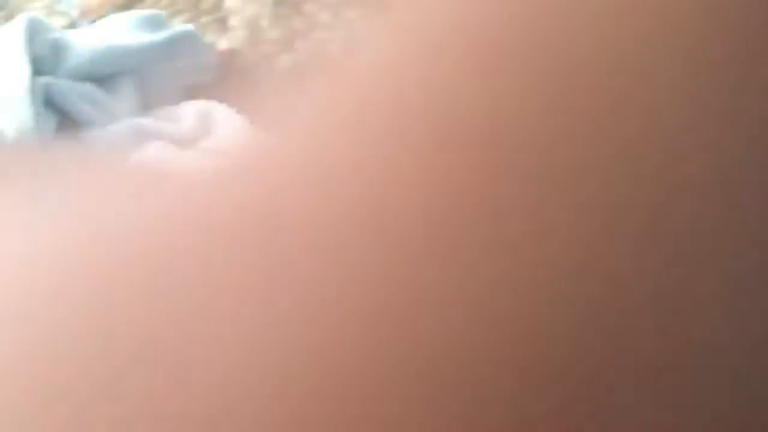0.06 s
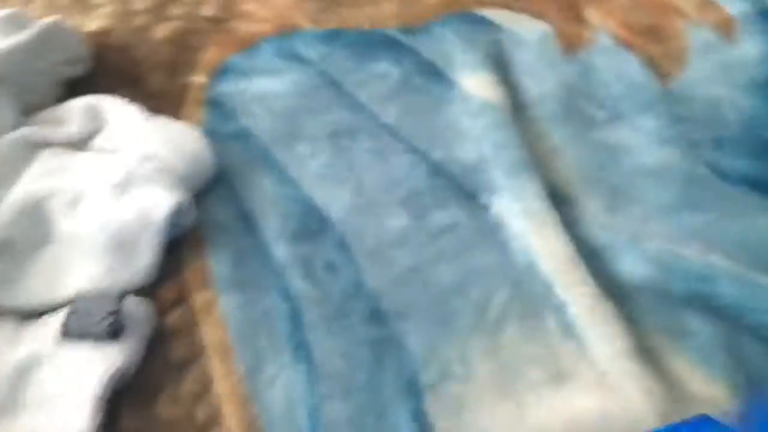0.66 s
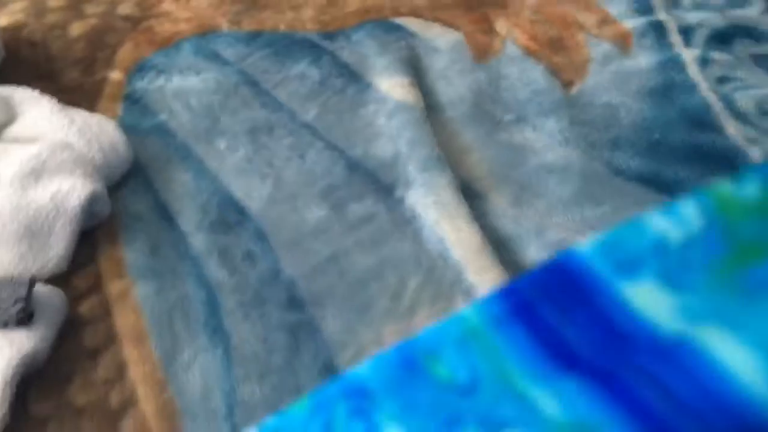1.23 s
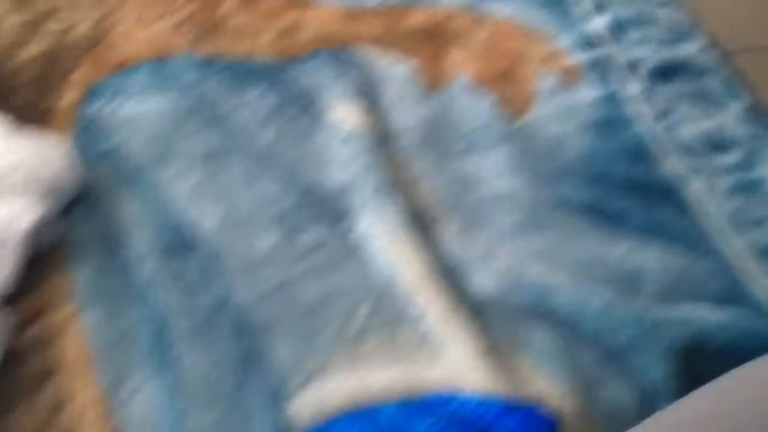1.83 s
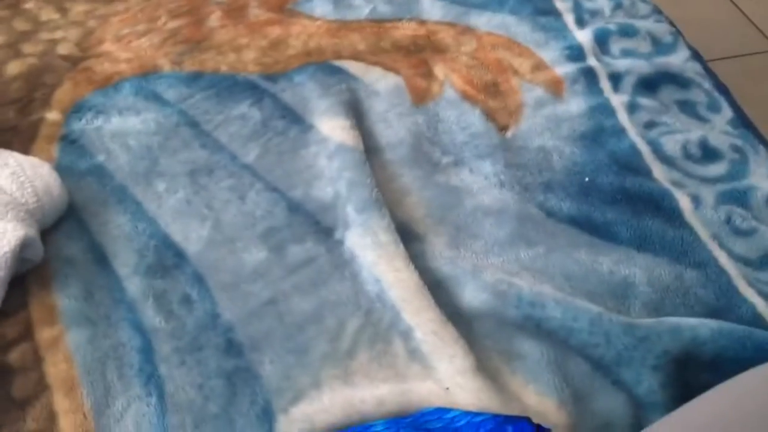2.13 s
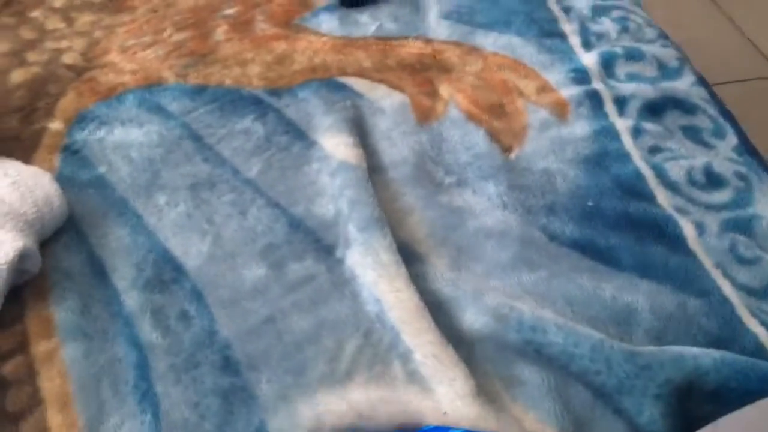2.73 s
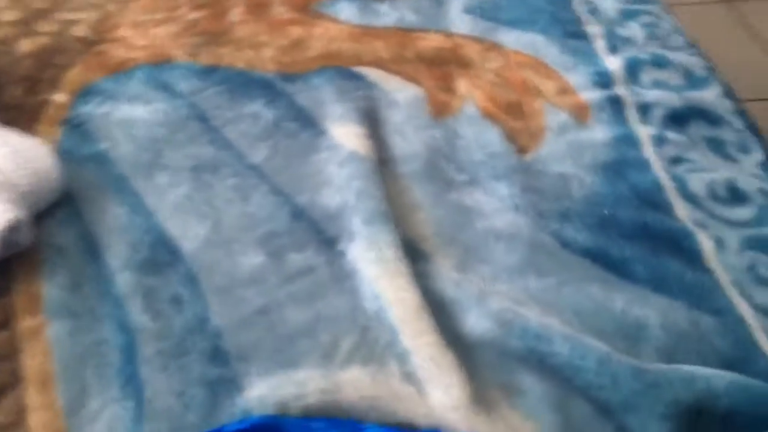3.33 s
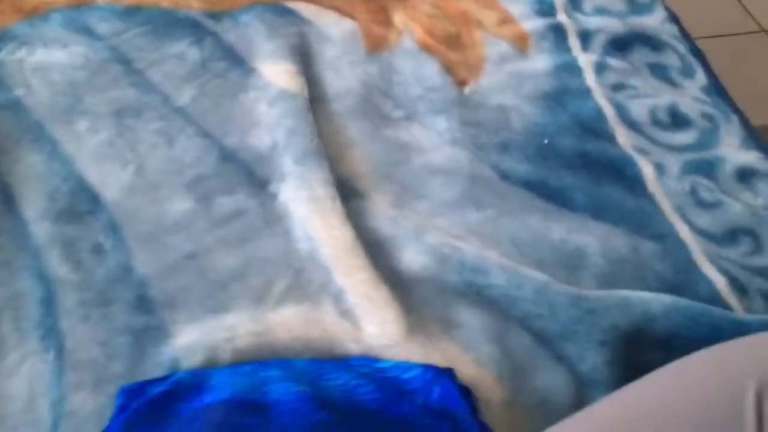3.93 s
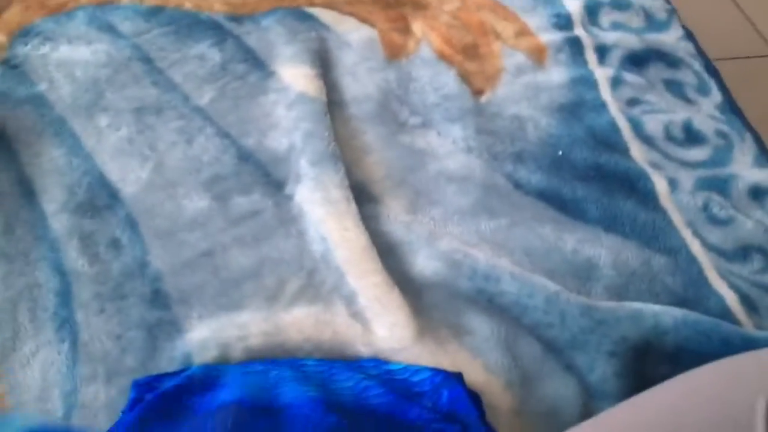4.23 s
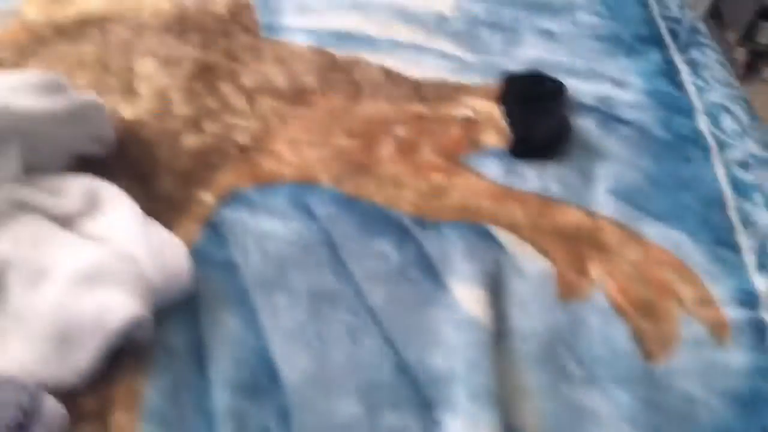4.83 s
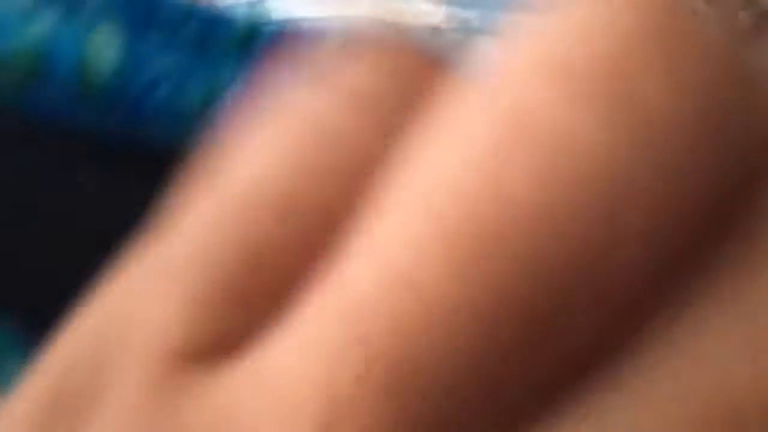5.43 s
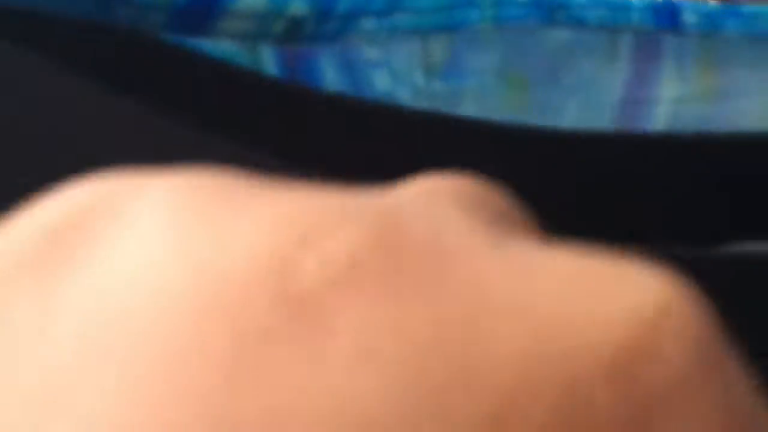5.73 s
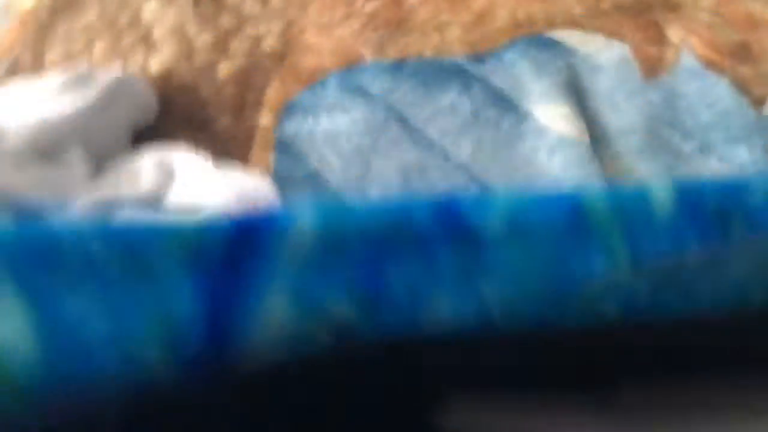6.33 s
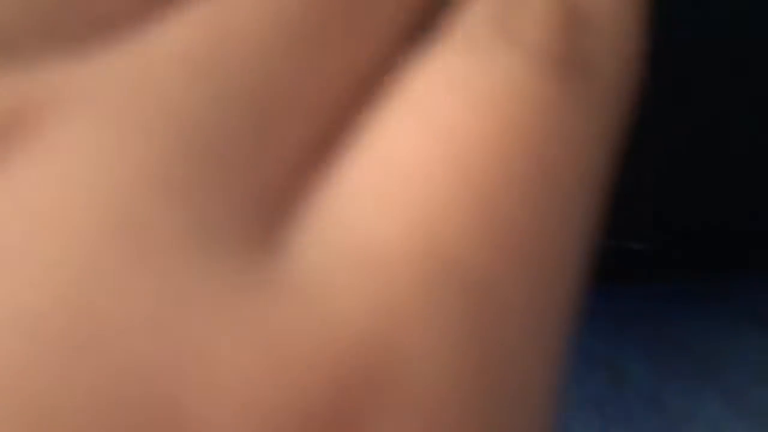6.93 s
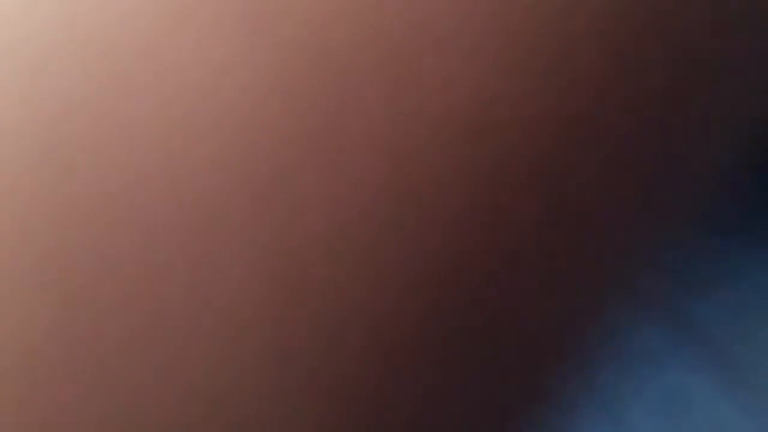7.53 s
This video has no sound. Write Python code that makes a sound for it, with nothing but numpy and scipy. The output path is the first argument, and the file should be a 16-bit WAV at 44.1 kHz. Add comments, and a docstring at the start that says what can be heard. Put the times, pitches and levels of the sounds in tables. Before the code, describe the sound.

Fabric slides right against a hand-held phone in a quiet room. Short, uneven strokes swell and stop abruptly, each a papery rustle with a fine hiss. Fingers tap the case and the hand bumps it with soft thuds and a low rumble. After a brief lull, the rubbing resumes with sharper knocks and snapping folds, then turns looser and softer, with tiny ticks from the weave.

```python
"""Cloth rubs and slides right against a hand-held phone in a quiet room.
Each stroke speeds up and stops short; its catching threads make a papery rustle and a fine hiss.
Folds pull tight and snap free, the weave ticks, and faint bands of noise glide in pitch.
Fingers tap the case, and the hand bumps it with soft thuds and rumbles as it moves."""
import sys
import numpy as np
from scipy import signal
from scipy.fft import rfft, irfft
from scipy.io import wavfile
from scipy.ndimage import uniform_filter1d

SR = 44100
rng = np.random.default_rng(int(sys.argv[2]) if len(sys.argv) > 2 else 0)


def dump_mix(stems):
    """Bounce the given channels to the path in sys.argv[1] as a 16-bit WAV at rate SR."""
    frames = np.atleast_2d(stems).T  # one column per channel
    limited = np.clip(frames, -1, 1)  # hard clip at full scale
    pcm = np.round(limited * 32767).astype(np.int16)
    wavfile.write(sys.argv[1], SR, pcm)


N = 334347
T = np.arange(N) / SR
GENTLE_DB = -60.5  # a gentle slide: other levels are compared with this

# strokes of the cloth: fastest moment t/s, speeding up/s, braking/s, rustle level/dB, hiss level/dB
CLOTH_STROKES = [(.01, .05, 0.13, -50, -49.5), (.145, .02, .03, -53, -51), (.22, 0.033, 0.18, -55.5, -51.5),
                 (.36, 0.063, 0.033, -61, -48), (.555, 0.05, .07, -53.5, -46.5),
                 (.68, 0.17, 0.083, -53, -51.5), (1.17, .08, 0.15, -53.5, -55), (1.3, 0.035, .03, -61, -59),
                 (1.58, 0.075, 0.072, -55, -45), (1.625, .03, 0.087, -50.5, -55),
                 (1.8, 0.063, 0.053, -64.5, -65), (2.12, .07, 0.044, -76, -71),
                 (2.47, 0.027, .08, -62, -58), (2.765, .045, 0.081, -53.5, -49.5),
                 (2.91, 0.13, 0.12, -51.5, -55.5), (3.11, 0.043, 0.032, -61, -55),
                 (3.26, 0.054, 0.04, -51, -49), (3.38, 0.072, 0.15, -56.5, -44.5),
                 (3.54, 0.069, 0.033, -52, -51.5), (3.72, 0.055, 0.074, -61, -63.5),
                 (3.97, 0.081, 0.093, -53, -52.5), (4.06, 0.051, .058, -50.5, -40),
                 (4.19, 0.028, .03, -63.5, -63), (4.43, 0.051, 0.076, -49.5, -49.5),
                 (4.75, 0.042, 0.066, -46, -57), (4.85, 0.058, .1, -69, -56),
                 (5.02, 0.037, 0.064, -57, -52.5), (5.135, 0.027, .03, -61, -55),
                 (5.39, 0.065, 0.097, -71, -59), (5.489, 0.019, 0.074, -55, -46.5),
                 (5.635, 0.021, 0.063, -68, -51), (5.775, 0.031, 0.044, -57, -44),
                 (5.889, 0.052, 0.094, -59, -45), (6.255, 0.028, 0.091, -67, -63),
                 (6.39, 0.02, 0.12, -63, -57), (6.55, .02, 0.032, -61.5, -61),
                 (6.68, .025, 0.038, -57.5, -57.5), (6.79, 0.012, .016, -56, -57.5),
                 (6.905, 0.053, 0.033, -51.5, -52.5), (6.98, 0.04, 0.062, -59, -52.5),
                 (7.084, 0.025, 0.043, -57.5, -48.5), (7.17, 0.043, 0.043, -58.5, -53.5),
                 (7.47, 0.018, 0.04, -57.5, -50), (7.57, 0.045, .05, -57, -65)]
# the cloth creeping along between strokes: t/s, level/dB
SLOW_CREEP = [(0, -64), (.9, -59.5), (1.45, -56.5), (1.69, -55.5), (1.73, -72), (2.4, -72.5), (2.72, -60),
              (3.15, -63.5), (3.5, -58), (3.65, -68), (4.3, -67.5), (4.53, -59), (5.12, -56.5), (5.4, -63),
              (6.03, -60.5), (6.16, -70), (6.76, -67), (7.18, -62), (7.42, -72.5)]
def sliding(build_shape=1.3, brake_shape=0.73, creep_hiss_db=-61, hiss_slope=1.25):
    """Faster cloth is louder: gives rustle and hiss levels in dB for strokes on top of a slow creep."""
    creep_db = curve(SLOW_CREEP)
    rustle_power = amp(creep_db) ** 2
    hiss_power = amp(creep_hiss_db + hiss_slope * (creep_db - GENTLE_DB)) ** 2
    for s, build, brake, rustle_db, hiss_db in CLOTH_STROKES:
        near = slice(*np.searchsorted(T, [s - 5 * build, s + brake]))
        t = T[near] - s
        speeding_up = np.exp(-np.abs(t / build) ** build_shape)
        braking = np.clip(1 - t / brake, 0, 1) ** brake_shape
        speed = np.where(t < 0, speeding_up, braking)
        rustle_power[near] += (amp(rustle_db) * speed) ** 2
        hiss_power[near] += (amp(hiss_db) * speed) ** 2
    return 10 * np.log10(rustle_power), 10 * np.log10(hiss_power)


# where the rubbing is: t/s, place (0 = on the case, 1 = loose cloth beside it)
RUB_PLACE = [(0, 0.065), (.5, 0), (5.0, 0.068), (5.5, 0.94), (7.58, 1)]
# tone of the rustle and the hiss, on the case and in loose cloth: f/Hz, level/dB
CASE_RUSTLE = [(100, -23), (280, 1), (500, -4), (760, 1), (970, 4), (1300, -2.5), (1600, 0), (2300, -2),
               (3000, -6.5), (3700, -6), (4900, -15), (9000, -16.5)]
LOOSE_RUSTLE = [(100, 6.5), (230, 9.5), (500, 0), (750, -5), (1100, -1), (1400, -5), (1800, -1),
                (2600, -3.5), (3600, -6.5), (4900, -8.5), (9000, -28)]
CASE_HISS = [(1200, -58), (3600, -4.5), (4900, -7), (5600, -4.5), (7500, -5.5), (9000, -0.5), (9900, -1.5),
             (10400, -4.5), (11800, 1.5), (14000, -2.5), (16000, -4.5)]
LOOSE_HISS = [(1200, -37), (3600, -6), (4900, -4), (6100, 4), (7400, 0.5), (9300, 1), (10400, -5),
              (11800, -2.5), (13500, -7), (16000, -16)]
# how far the hiss leans towards its highest part: t/s, tilt/dB
BRIGHTNESS = [(0, -8), (.14, -0.5), (4.1, .5), (4.6, -0.5), (7.2, 4), (7.47, -3)]
def rubbing(rustle_level, hiss_level, rustle_trim_db=-2.5, hiss_trim_db=-4.0, tilt_per_db=0.0977):
    """Sliding cloth shakes the case and hisses; a wavering grip makes both flutter together."""
    grip = wander(rate_hz=47)
    loose = np.clip(curve(RUB_PLACE), 0, 1)
    on_case, off_case = np.sqrt(1 - loose), np.sqrt(loose)
    coarse = shifting_contact(threads(per_s=1500, spread_db=2.5, click_share=0.36), patchy_db=2.5)
    fine = shifting_contact(threads(per_s=4900, spread_db=4.5, click_share=0.22), patchy_db=2)
    rustle = on_case * colour(coarse, CASE_RUSTLE) + off_case * colour(coarse, LOOSE_RUSTLE)
    hiss = on_case * colour(fine, CASE_HISS) + off_case * colour(fine, LOOSE_HISS)
    # a faster slide makes the hiss brighter
    dull = signal.sosfiltfilt(signal.butter(2, 10000, fs=SR, output="sos"), hiss)
    tilt = amp(curve(BRIGHTNESS) + tilt_per_db * (hiss_level - GENTLE_DB))
    hiss = dull / tilt + (hiss - dull) * tilt
    rustle *= amp(rustle_level + rustle_trim_db + grip)
    hiss *= amp(hiss_level + hiss_trim_db + 1.45 * grip)
    return rustle + hiss


def threads(per_s, spread_db, click_share):
    """Threads let go: separate clicks of uneven size over a blur of countless tiny ones."""
    size = amp(spread_db * np.minimum(rng.exponential(1, N), 4))
    clicks = size * rng.choice([-1, 1], N) * (rng.random(N) < per_s / SR)
    blur = rng.standard_normal(N)
    return np.sqrt(click_share) * unit(clicks) + np.sqrt(1 - click_share) * blur


def shifting_contact(x, patchy_db):
    """The touching spot keeps changing, so some pitches briefly stand out and fade again."""
    frames = dict(nperseg=512, noverlap=384)
    spectrum = signal.stft(x, **frames)[2]
    patches = uniform_filter1d(rng.standard_normal(spectrum.shape), size=7, axis=0)  # smooth over pitch
    patches = uniform_filter1d(patches, size=18, axis=1)  # and over time
    spectrum *= amp(patchy_db * unit(patches))
    return unit(signal.istft(spectrum, **frames)[1][:N])


# folds snapping free: t/s, level/dB, build-up/s, fall/s, rustle compared with hiss/dB
FOLD_SNAPS = [(.161, -53.5, 0.0061, 0.0057, 8.5), (.484, -43, .002, 0.0024, -12),
              (.970, -51.5, 0.011, 0.011, 2), (1.7048, -44.5, 0.00078, 0.00073, -1),
              (2.149, -53.5, 0.00066, 0.0011, -16), (3.1924, -34.5, 0.0014, 0.00072, -3.5),
              (3.245, -32, 0.0079, 0.00094, -3.5), (3.4887, -19.5, 0.00031, 0.00053, -8.5),
              (3.546, -41.5, 0.0091, 0.0054, -6), (4.112, -48.5, 0.0023, 0.001, 3.5),
              (4.443, -33.5, 0.0037, 0.0012, 5), (4.748, -42, 0.0036, 0.007, -7),
              (4.9303, -30.5, 0.0008, 0.0013, -6), (5.1494, -32.5, 0.00065, 0.009, -3.5),
              (5.1577, -21.5, 0.0032, 0.0027, -23), (5.245, -44.5, 0.0049, 0.0031, -0.5),
              (5.4578, -33.5, 0.00064, 0.0014, 1.5), (5.477, -34.5, 0.0034, 0.0066, -6.5),
              (7.296, -54, .002, .004, -3), (7.448, -52, .0005, .01, -17)]
def fold_snaps(reach_s=0.08):
    """Rubbing grows as a fold is pulled tight and dies away as it lets go."""
    hiss, rustle, out = noise(CASE_HISS), noise(CASE_RUSTLE), np.zeros(N)
    for s, db, rise, fall, rustle_db in FOLD_SNAPS:
        near = slice(max(int((s - reach_s) * SR), 0), int((s + reach_s) * SR))
        t = T[near] - s
        swell = np.exp(-np.abs(t) / np.where(t < 0, rise, fall))
        out[near] += amp(db) * swell * (hiss[near] + amp(rustle_db) * rustle[near])
    return out


# single threads and seams clicking: t/s, level/dB
SINGLE_TICKS = [(5.737, -36), (5.7767, -34), (6.127, -47.5), (6.243, -48), (6.3376, -39), (6.344, -43),
                (6.352, -43), (6.462, -38), (6.604, -46), (6.9636, -37.5), (7.043, -43)]
# runs of ticks: start t/s, end t/s, rate/Hz, level/dB, place (1 = on the case, 0 = loose cloth)
TICK_RUNS = [(0.304, 0.391, 92, -42.5, 1), (6.222, 6.75, 69, -54, 0), (6.78, 7.335, 77, -58.5, 0)]
def weave_ticks(fade_s=0.00071, jitter=0.43, spread_db=2.0):
    """The weave sticks and slips in tiny bright ticks, alone or in uneven runs."""
    loose, case = np.zeros((2, N))
    tick = np.exp(-T[:400] / fade_s)
    for s, db in SINGLE_TICKS:
        add(loose, s, amp(db) * tick)
    for start, end, rate, db, on_case in TICK_RUNS:
        gaps, softness = rng.standard_normal((100, 2)).T
        times = start + np.cumsum(np.exp(jitter * gaps)) / rate
        for s, softer in zip(times[times < end], softness):
            add(case if on_case else loose, s, amp(db - spread_db * softer) * tick)
    return loose * noise(LOOSE_HISS) + case * noise(CASE_HISS)


# faint gliding bands of noise: t/s, length/s, start f/Hz, end f/Hz, band width/Hz, level/dB
# the one at 2.707 s is a low, hollow colour in the rubbing that glides downward
# the one at 6.849 s is breath-like, near 1.8 kHz, and sinks slightly
GLIDING_BANDS = [(2.707, 0.2, 561, 349, 260, -60), (3.355, 0.052, 1313, 1420, 260, -54.5),
                 (3.881, 0.24, 1042, 953, 321, -62), (4.524, 0.011, 3110, 3560, 900, -51),
                 (4.735, 0.046, 3130, 3190, 600, -55.5), (5.15, 0.011, 3950, 3880, 990, -37.5),
                 (6.381, 0.018, 2310, 2600, 1400, -62), (6.821, 0.034, 3100, 3270, 1847, -59.5),
                 (6.849, .42, 1944, 1590, 360, -64.5), (7.221, 0.0086, 2240, 3200, 1500, -54),
                 (7.288, 0.014, 2630, 3800, 1200, -60), (7.442, 0.056, 4300, 3730, 2000, -59)]
def gliding_bands(fade_db=6):
    """Each narrow band of noise glides in pitch and fades."""
    out = np.zeros(N)
    for s, length, start_hz, end_hz, width_hz, db in GLIDING_BANDS:
        n = int(length * SR)
        white = rng.standard_normal((SR, 2)) @ [1, 1j]
        fuzz = signal.lfilter(*signal.butter(2, width_hz / 2, fs=SR), white)[-n:]
        # multiplying by this lifts the low fuzz up to the gliding pitch
        glide = np.exp(2j * np.pi * np.cumsum(np.linspace(start_hz, end_hz, n)) / SR)
        band = (fuzz * glide).real * amp(np.linspace(0, -fade_db, n))
        add(out, s, amp(db) * unit(band) * signal.windows.tukey(n, 0.3))
    return out


# fingers tapping the case: t/s, peak level/dB, hardness as the f/Hz where the highs start to drop
FINGER_TAPS = [(.160, -30, 1490), (0.956, -34, 1520), (1.39, -39, 2500), (1.44, -42, 2500),
               (2.912, -35, 1500), (3.1904, -27, 1200), (3.193, -28, 600), (3.2178, -29, 500),
               (3.2445, -16.5, 3000), (3.498, -22.5, 1410), (3.554, -29, 1370), (3.857, -43, 2016),
               (4.4415, -25, 2500), (4.4426, -17.5, 1210), (4.729, -28.5, 1315), (5.154, -34, 1200),
               (5.159, -28.5, 890), (5.1828, -24, 2500), (5.335, -42, 900), (5.465, -34, 1500),
               (6.296, -44, 700), (6.345, -45, 700)]
# the notes the case rings with: f/Hz, level/dB, time to fade by 60 dB/s
CASE_NOTES = [(331, -4.5, 0.016), (926, 2.5, 0.01), (1530, 3, 0.01), (2220, 3, 0.0086), (3220, 7, 0.0059)]
def finger_taps(pitch_scatter=0.075):
    """A tap rings the case and the hand quickly stills it; a softer tap has fewer high notes."""
    out, t = np.zeros(N), T[:SR // 20]
    for s, db, hardness_hz in FINGER_TAPS:
        detunes = 1 + pitch_scatter * rng.standard_normal(len(CASE_NOTES))
        ring = sum(amp(level - 60 * t / fade_s) * np.cos(2 * np.pi * hz * detune * t)
                   for (hz, level, fade_s), detune in zip(CASE_NOTES, detunes))
        ring = signal.lfilter(*signal.butter(2, hardness_hz, fs=SR), ring)
        add(out, s, amp(db) * ring / np.abs(ring).max())
    return out


# the hand bumping the phone: t/s, level/dB, start f/Hz
HAND_BUMPS = [(0.161, -32, 153.4), (0.24, -33.5, 307), (0.249, -36.5, 80), (0.293, -38, 90),
              (0.4823, -16.5, 125), (0.723, -33, 101), (0.795, -33, 142), (1.115, -36, 101),
              (1.205, -41, 150), (3.191, -25.5, 510), (3.1951, -24, 192), (3.494, -18.5, 105),
              (3.574, -33, 90), (4.134, -38.5, 70), (4.198, -38.5, 350), (4.442, -19.5, 550),
              (4.4451, -29.5, 231), (4.93, -32.5, 306), (5.159, -27, 160), (5.168, -28, 336),
              (5.189, -32.5, 62), (5.244, -31, 90), (5.4612, -23, 300), (5.469, -28.5, 110),
              (6.398, -39.5, 110), (6.552, -35.5, 85.5), (6.92, -41, 100), (7.09, -42, 120),
              (7.519, -43, 220)]
def hand_bumps(rest_hz=52, sag_s=0.0071, rise_cycles=0.18, fade_cycles=1.54, rock_db=-22, rock_s=0.038):
    """A bump rocks the phone; its pitch sinks as the touch relaxes, and higher bumps end sooner."""
    out, t = np.zeros(N), T[:SR // 4]
    for s, db, start_hz in HAND_BUMPS:
        hz = rest_hz + (start_hz - rest_hz) * np.exp(-t / sag_s)
        cycles = np.cumsum(hz) / SR
        press = 1 - np.exp(-(cycles / rise_cycles) ** 2)  # flesh gives way, so there is no click
        thud = np.exp(-t * start_hz / fade_cycles)
        rocking = amp(rock_db) * rest_hz / start_hz * np.exp(-t / rock_s)
        add(out, s, amp(db) * np.sin(2 * np.pi * cycles) * press * (thud + rocking))
    return out


# tone of the hand's rumble: f/Hz, level/dB
RUMBLE_TONE = [(15, -27), (30, -11), (55, 7), (80, -1.5), (120, -4), (260, -13), (340, -18), (600, -32.5),
               (1500, -48.5)]
def hand_rumble(rustle_level, base_db=-57.5, follow=0.33, smooth_s=0.15, loose_boost_db=1.5):
    """The moving hand rumbles, more when it pushes harder and a little more on loose cloth."""
    effort_db = uniform_filter1d(rustle_level, int(smooth_s * SR)) - GENTLE_DB
    return amp(base_db + follow * effort_db + loose_boost_db * curve(RUB_PLACE)) * noise(RUMBLE_TONE)


def room_echo(x, fade_s=0.34, echo_db=-23, dull_hz=3500):
    """The furnished room adds a short, dull echo, faint beside sounds right at the microphone."""
    t = T[:SR // 2]
    tail = rng.standard_normal(len(t)) * amp(-60 * t / fade_s) * (t > 0.004)
    tail = signal.lfilter(*signal.butter(1, dull_hz, fs=SR), tail)
    return x + amp(echo_db) * signal.fftconvolve(x, tail / np.linalg.norm(tail))[:N]


# tone of the still room: f/Hz, level/dB
ROOM_TONE = [(20, -16), (58, 2.5), (85, -2.5), (120, 2.5), (250, -12.5), (500, -18.5), (1000, -21.5),
             (2500, -36), (5000, -32), (9000, -40.5), (16000, -66)]
def still_room(level_db=-63):
    """A faint, low, steady hush lies under everything."""
    return amp(level_db) * noise(ROOM_TONE)


def amp(db):
    """Turns decibels into a number to multiply by."""
    return 10 ** (np.asarray(db) / 20)


def unit(x):
    """Scales x to an average strength (rms) of 1."""
    return x / np.sqrt(np.mean(x ** 2) + 1e-20)


def curve(rows):
    """Joins (t/s, value) points with straight lines, one value per sample."""
    return np.interp(T, *np.transpose(rows))


def add(mix, s, sound):
    """Adds a sound to the mix, s seconds in."""
    part = mix[max(round(s * SR), 0):][:len(sound)]
    part += sound[:len(part)]


def colour(x, tone):
    """Shapes x with a tone table of (f/Hz, level/dB), at strength 1."""
    hz, db = np.transpose(tone)
    f = np.fft.rfftfreq(N, 1 / SR)
    gain = amp(np.interp(np.log(f + 1), np.log(hz), db))
    return unit(irfft(rfft(x) * gain, N))


def noise(tone):
    """Steady noise with the given tone."""
    return colour(rng.standard_normal(N), tone)


def wander(rate_hz):
    """A smooth random wobble of strength 1, mostly slower than rate_hz."""
    f = np.fft.rfftfreq(N, 1 / SR)
    return unit(irfft(rfft(rng.standard_normal(N)) / (1 + (f / rate_hz) ** 2), N))


def scene():
    """Sliding cloth, knocks on the case and the hand's rumble, over the still room."""
    rustle_level, hiss_level = sliding()
    knocks = room_echo(fold_snaps() + finger_taps() + hand_bumps())
    cloth = rubbing(rustle_level, hiss_level) + weave_ticks()
    return (cloth + gliding_bands() + knocks + hand_rumble(rustle_level) + still_room())[None]


def record(dry, low_cut_hz=22, high_cut_hz=16000):
    """The microphone loses the deepest bass and the very highest treble."""
    x = signal.lfilter(*signal.butter(1, low_cut_hz, "high", fs=SR), dry)
    high_cut = signal.firwin(511, high_cut_hz, window=("kaiser", 9), fs=SR)
    return signal.oaconvolve(x, high_cut[None], "same")


dry = scene()
out = record(dry)
dump_mix(out)
```